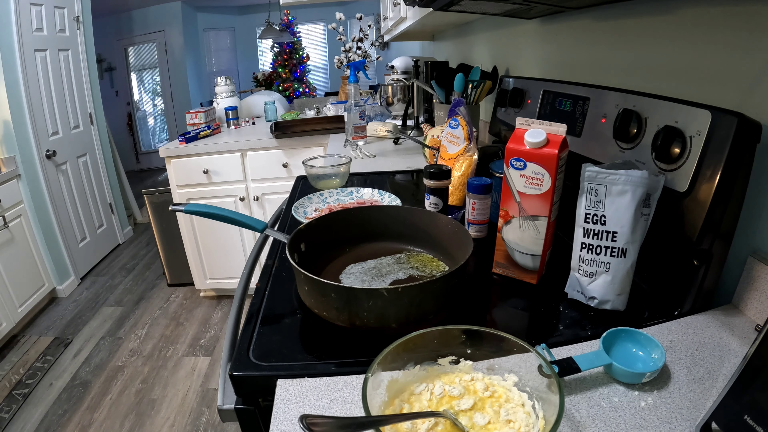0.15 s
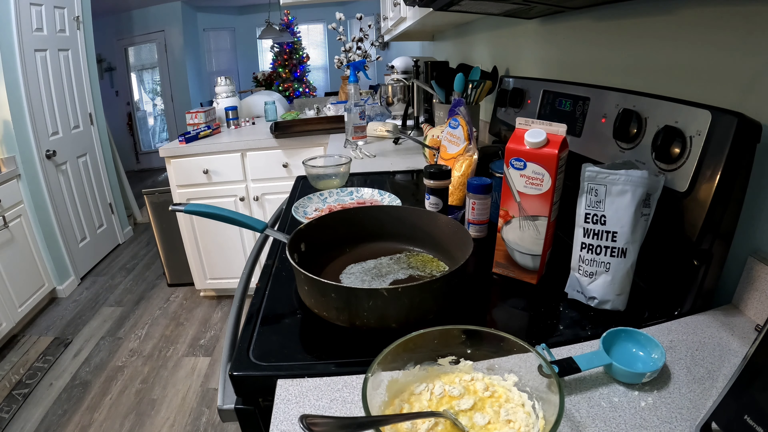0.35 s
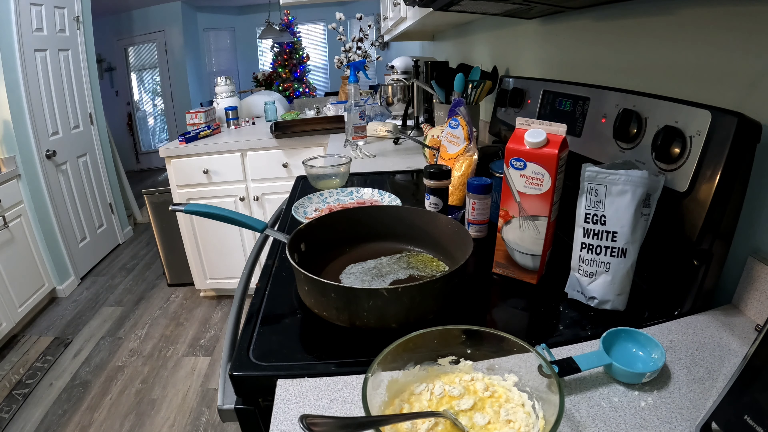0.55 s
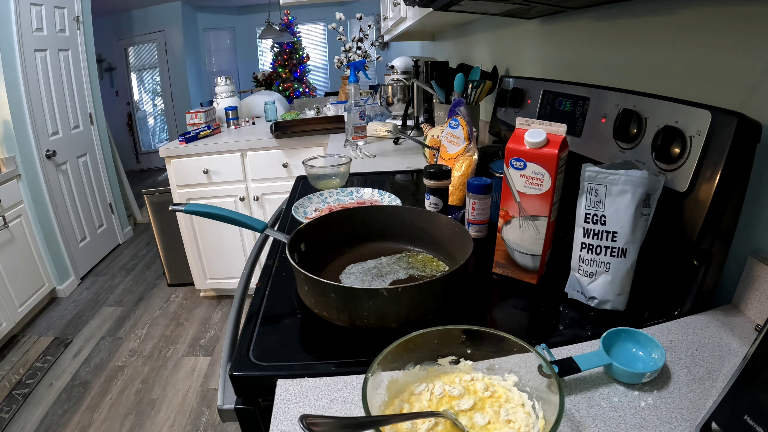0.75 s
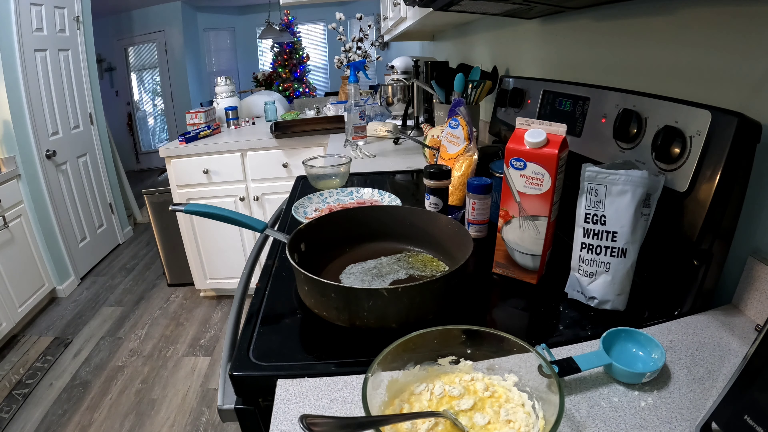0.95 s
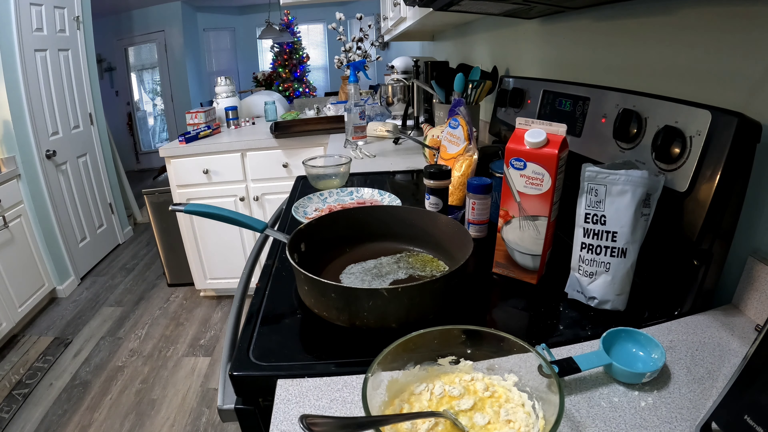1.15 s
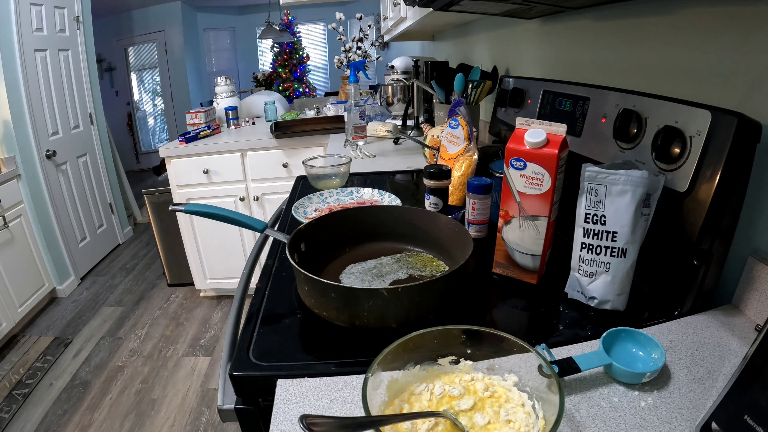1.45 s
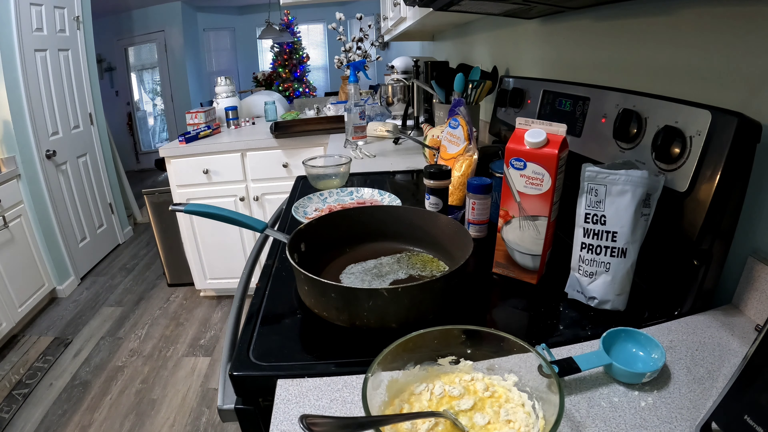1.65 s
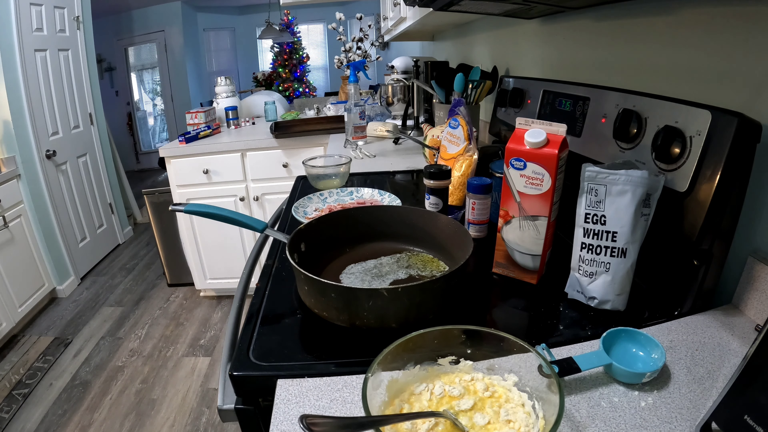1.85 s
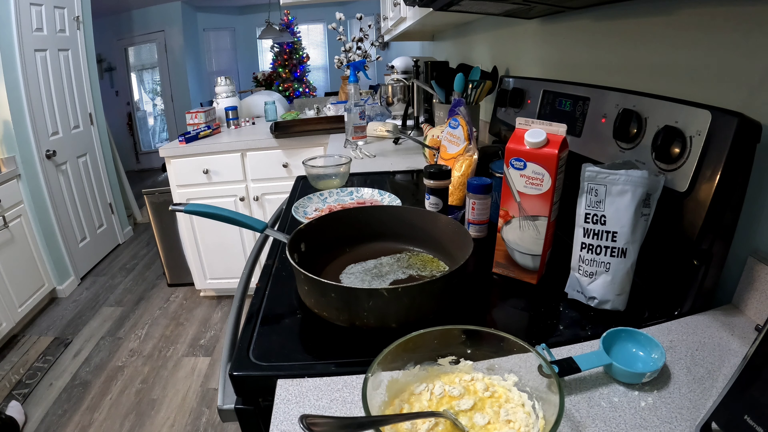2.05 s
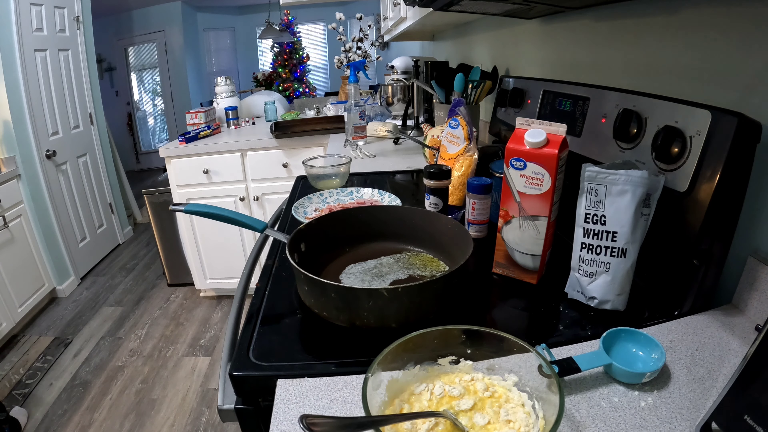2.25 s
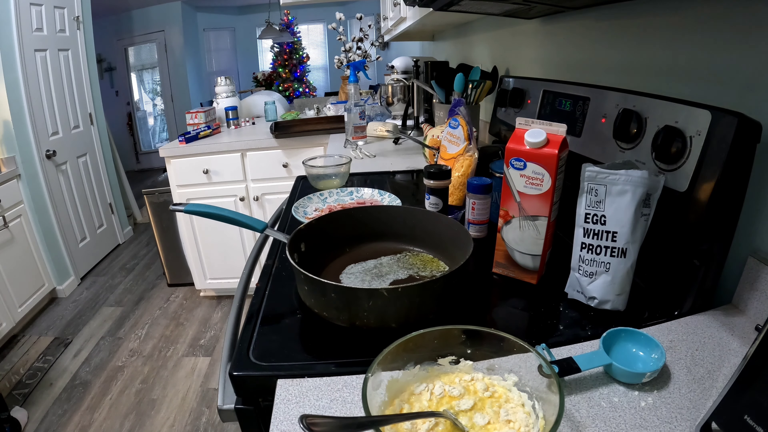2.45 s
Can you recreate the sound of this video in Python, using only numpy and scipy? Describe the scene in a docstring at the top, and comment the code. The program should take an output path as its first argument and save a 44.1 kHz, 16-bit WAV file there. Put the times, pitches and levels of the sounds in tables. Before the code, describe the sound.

A drawer of utensils is pulled and jolted a few metres off in a home kitchen, rumbling, clattering and briefly ringing, then settling into softer knocks. Close to the microphone, fat ticks and spits in a pan, popping once.

```python
"""A home kitchen, on two closely spaced microphone ports. A few metres off, a drawer of utensils is
pulled and jolted: the runners' bumps shake the cabinet into a rumble, tools clatter, and loose steel
rings in the room. Close to the microphone, fat ticks and spits in a pan, each spit a tiny burst
with a short hiss after it. Quiet room tone lies under it all."""
import sys
import numpy as np
from scipy import signal
from scipy.fft import rfft, irfft
from scipy.io import wavfile
from scipy.ndimage import uniform_filter1d

SR = 44100
rng = np.random.default_rng(int(sys.argv[2]) if len(sys.argv) > 2 else 0)


def pcm_store(signal):
    """Save signal as 16-bit PCM."""
    levels = np.round(np.clip(np.atleast_2d(signal), -1, 1) * 32767)
    wavfile.write(sys.argv[1], SR, levels.astype(np.int16).T)


N = 114660
T, HZ = np.arange(N) / SR, np.fft.rfftfreq(N, 1 / SR) + 1e-3

# jolts of the drawer's load (time [s], dull clatter [dB], bright clatter [dB], ringing steel [dB])
DRAWER_JOLTS = [(0.216, -42.5, -47, -70), (0.416, -46, -53, -84), (0.475, -32.5, -33, -45),
                (.666, -37.5, -30, -47.5), (0.727, -33.5, -24, -41.5), (.786, -39, -25.5, -26),
                (.7975, -53, -40.5, -32.5), (.832, -44, -68, -37), (0.887, -32.5, -37.5, -67),
                (.928, -36.5, -33, -38), (1.03, -28.5, -28.5, -40), (1.205, -39.5, -42, -70),
                (1.476, -36, -45.5, -46.5), (1.509, -41, -40.5, -61), (1.573, -40.5, -52, -59),
                (1.855, -42.5, -50, -58), (2.253, -43.5, -67, -68), (2.281, -38.5, -41, -67)]


def undb(db):
    return 10 ** (np.asarray(db) / 20)


def unit_rms(x):
    return x / np.sqrt(np.mean(x ** 2))


def on_hz(table):
    """Read a (frequency [Hz], value) table at every frequency."""
    hz, value = np.array(table, float).T
    return np.interp(np.log(HZ), np.log(hz), value)


def colour(x, spectrum):
    """Shape by (frequency [Hz], level [dB]); white noise keeps its rms."""
    gain = undb(on_hz(spectrum)) * (HZ > spectrum[0][0]) * (HZ < spectrum[-1][0])
    return irfft(rfft(x) * unit_rms(gain), N)


def ring(x, hz, t60):
    """One decaying mode, driven by x."""
    pole = np.exp(2j * np.pi * hz / SR - np.log(1000) / (t60 * SR))
    return signal.lfilter([1], [1, -pole], x).imag


def fade(start, t60, rise_s=.003):
    """Quick rise, exponential fall."""
    age = np.maximum(T - start, 0)
    return (1 - np.exp(-age / rise_s)) * undb(-60 * age / t60)


def clicks(per_s, spread_db):
    """Random clicks of uneven size."""
    chance, sign, size = rng.random((3, N))
    return (chance < per_s / SR) * np.sign(sign - .5) * undb(-spread_db * np.log(size + 1e-9))


def mic_ports(x, unrelated):
    """Two close ports: level and phase differ, and a share of unrelated sound enters."""
    # likeness of the two ports (frequency [Hz], coherence [0-1])
    likeness = [(100, .999), (300, .995), (700, .97), (1500, .93), (4000, .7), (12000, .6)]
    # left port over right (frequency [Hz], level [dB])
    left_level = [(200, 0), (600, 2.6), (2500, 1.5), (6000, 2.2), (12000, 0)]
    # left port against right (frequency [Hz], phase [rad])
    left_phase = [(100, 0), (450, -.15), (2500, -1.1), (3200, -.6), (6000, -.2)]
    coherence = np.clip(on_hz(likeness), 0, 1)
    mid = rfft(x) * np.sqrt((1 + coherence) / 2)
    side = rfft(unrelated) * np.sqrt((1 - coherence) / 2)
    tilt = undb(on_hz(left_level) / 2) * np.exp(.5j * on_hz(left_phase))
    return np.array([irfft((mid + side) * tilt, N), irfft((mid - side) / tilt, N)])


def kitchen(x, wet_db, low_t60=.5, treble_t60=.45):
    """Direct sound and a diffuse tail that dulls, heard at both ports."""
    t, wet = T[:SR // 2], undb(wet_db)
    def tail():
        noise = rng.standard_normal((2, len(t)))
        low = uniform_filter1d(noise[0], size=9) * undb(-60 * t / low_t60) * 3
        response = (low + noise[1] * undb(-60 * t / treble_t60)) * np.minimum(t / .0026, 1)
        return signal.fftconvolve(x, response / np.sqrt(np.sum(response ** 2)))[:N]
    total = np.hypot(1, wet)
    return mic_ports(x + wet * tail(), total * tail()) / total


def room_tone(level_db=-47):
    """The kitchen's steady background noise, mostly bass."""
    # spectrum of the quiet room (frequency [Hz], level [dB])
    spectrum = [(20, 1), (45, -3.5), (85, -3), (320, -12.5), (830, -29), (1450, -24), (2300, -27.5),
                (3000, -34), (5400, -33), (7700, -42), (15500, -58.5)]
    return mic_ports(*(colour(noise, spectrum) for noise in rng.standard_normal((2, N)))) * undb(level_db)


def frying(pop_db=14, snap_db=-9, crackle_db=-66, hiss_db=-7, left_db=-.5):
    """Close up: each spit of fat is a burst of a few cycles and a hiss of the pan; crackle between."""
    # spits of fat; the big ones also pop low (time [s], level [dB], pitch [Hz])
    spits = [(.0422, -42, 6400), (.1047, -62, 5800), (.1486, -51, 6940), (.1565, -40.5, 5300),
             (.2868, -42.5, 2600), (.3433, -44, 5630), (.358, -42.5, 5300), (.3926, -42.5, 5270),
             (0.49, -27, 5430), (.628, -36.5, 7760), (.6434, -37.5, 5540), (1.2044, -15, 990),
             (1.2045, -28.5, 2900), (1.2047, -30.5, 5840), (1.2599, -35, 6000), (1.2957, -38, 6800),
             (1.3229, -47, 6700), (1.3399, -43, 5950), (1.3618, -41, 5700), (1.3813, -36.5, 4080),
             (1.3815, -36, 2330), (1.398, -37.5, 5900), (1.4541, -45, 6500), (1.4735, -35, 6240),
             (1.6395, -32, 3530), (1.7, -37, 5560), (1.801, -44, 5100), (1.8172, -31, 990),
             (1.8173, -31, 2860), (1.8174, -24.5, 5820), (1.8382, -32, 4660), (1.9687, -28, 6200),
             (1.9884, -32, 6000), (2.0122, -27.5, 4960), (2.173, -38.5, 5660), (2.2179, -43, 6050),
             (2.2715, -37.5, 6200), (2.2895, -33, 3700), (2.2901, -35, 5470), (2.367, -33, 2140),
             (2.4538, -37, 5900), (2.5944, -31, 6100)]
    length, spit_t60, hiss_t60 = 600, .009, .1
    fat, decay = np.zeros(N + length), undb(-60 * T[:length] / spit_t60)
    bursts = rng.standard_normal((len(spits), length))
    bursts[:, 8] += undb(pop_db)  # a sharp pop, then fizz
    for (start, db, hz), burst in zip(spits, bursts):
        pitched = signal.lfilter(*signal.butter(2, [hz / 1.25, hz * 1.25], "bandpass", fs=SR), burst)
        i = int(start * SR)
        fat[i:i + length] += undb(db) * (unit_rms(pitched) + undb(snap_db) * unit_rms(burst)) * decay
    crackle_band = signal.butter(2, [4800, 8500], "bandpass", fs=SR)
    crackle = signal.lfilter(*crackle_band, clicks(per_s=120, spread_db=2.5))
    fat = fat[:N] + undb(crackle_db) * unit_rms(crackle)
    fat = signal.lfilter(*signal.butter(3, 7900, fs=SR), fat)
    pan = rng.standard_normal((2, 6000)) + rng.standard_normal(6000)  # half shared by left and right
    pan *= undb(-60 * T[:6000] / hiss_t60)
    pan /= np.sqrt(np.sum(pan ** 2) / 2)
    hiss = signal.fftconvolve(fat[None], pan, axes=1)[:, :N]
    return (fat + undb(hiss_db) * hiss) * undb([[left_db / 2], [-left_db / 2]])


def cabinet():
    """Bumps of the runners shake the carcass and its panels; one panel hums for a moment."""
    # thumps through the cabinet (time [s], bass level [dB], panel level [dB])
    thumps = [(0.049, -46, -55), (0.159, -35.5, -51), (0.223, -31, -42), (.38, -37, -39.5),
              (0.476, -29.5, -34.5), (0.582, -32, -42), (0.67, -34, -35.5), (0.76, -23, -31.5),
              (0.864, -22.5, -32), (0.908, -24, -28.5), (1.003, -23.5, -32), (1.059, -22, -36),
              (1.2, -29.5, -43), (1.311, -36.5, -45.5), (1.366, -32, -38), (1.476, -27, -32),
              (1.542, -28, -31.5), (1.611, -30.5, -36), (1.676, -31, -43), (1.854, -28.5, -41),
              (1.932, -29, -45), (2.168, -31.5, -42.5), (2.268, -28, -30.5), (2.31, -59, -46)]
    # bass modes of the carcass (frequency [Hz], nominal width [Hz], level [dB])
    carcass = [(46.4, 40, -15), (72.4, 6.2, -4), (112.2, 19.4, -9)]
    # modes of the panels (frequency [Hz], nominal width [Hz], level [dB])
    panels = [(151.6, 35, -2.5), (202, 23.4, 0.5), (261.7, 31.5, -4), (297.8, 27, 1), (350.5, 11.7, -1.5),
              (417.8, 24, -6)]
    # one panel's sinking hum (time [s], pitch [Hz], level [dB])
    hum_path = [(.13, 147.4, -74), (0.169, 145.8, -45), (.55, 141.2, -41.5), (0.641, 135, -46)]
    starts, bass_db, panel_db = np.array(thumps).T
    envelopes = np.array([fade(start, t60=.42, rise_s=.0067) for start in starts])
    rumble = 0
    for levels, modes in ((bass_db, carcass), (panel_db, panels)):
        bumps, body = clicks(per_s=250, spread_db=1.2), 0
        for hz, width, db in modes:
            t60 = 1.92 / width
            body += undb(db) * unit_rms(ring(ring(bumps, hz, t60), hz, t60))
        # even out the body so that the thumps set its level
        body /= np.sqrt(uniform_filter1d(body ** 2, size=SR // 30) + .023 * np.mean(body ** 2))
        rumble += body * np.sqrt(undb(2 * levels) @ envelopes ** 2)
    times, hum_hz, hum_db = np.array(hum_path).T
    hum = np.sqrt(2) * np.sin(2 * np.pi * np.cumsum(np.interp(T, times, hum_hz)) / SR)
    return rumble + hum * undb(np.interp(T, times, hum_db, left=-99, right=-99))


def rattle(starts, levels_db):
    """Tools knock together: each jolt sets off dense, fading clicks."""
    envelopes = np.array([fade(start, t60=.18) for start in starts])
    return undb(levels_db) @ envelopes * unit_rms(clicks(per_s=3500, spread_db=2.5))


def pings():
    """Single pieces ring out on one note."""
    # struck pieces (time [s], pitch [Hz], level [dB])
    notes = [(0.939, 3400, -33.5), (.978, 3400, -32), (1.114, 1810, -33.5), (1.142, 1531, -29.5),
             (1.155, 878, -36), (1.208, 1531, -31), (1.292, 1500, -47), (1.595, 1550, -38)]
    return sum(undb(db) * fade(t, t60=.2) * np.sin(2 * np.pi * hz * (T - t)) for t, hz, db in notes)


def ringing_steel(rattle_db=-27, scatter_db=2.5, lag_s=.0035, t60_at_1khz=.17):
    """Each jolt strikes the loose steel, every mode unevenly; higher modes die sooner."""
    # modes of the steel tools (frequency [Hz], level [dB])
    modes = [(905, -5), (995, -4), (1560, -8), (1650, -7), (2185, 2), (2277, 2), (2415, -8), (3200, -6),
             (3375, -7), (3510, -7)]
    starts, _, _, steel_db = np.array(DRAWER_JOLTS).T
    jostle, steel = rattle(starts, steel_db) * undb(rattle_db), 0
    uneven_db = scatter_db * rng.standard_normal((len(starts), len(modes)))
    for (hz, db), offset_db in zip(modes, uneven_db.T):
        push = jostle.copy()
        push[((starts + lag_s) * SR).astype(int)] += undb(steel_db + offset_db)
        steel += undb(db) * ring(push, hz, t60_at_1khz * (hz / 1000) ** -.2)
    return steel


def clatter():
    """The drawer's load rattles at each jolt, in a dull layer and a bright one."""
    # spectrum of the dull knocks (frequency [Hz], level [dB])
    dull = [(450, -2.5), (620, -0.5), (780, -7), (1000, -3), (1300, -1), (1850, -3.5), (2250, 0.5),
            (2700, -14.5), (4000, -21)]
    # spectrum of the bright knocks (frequency [Hz], level [dB])
    bright = [(1530, -17), (2600, -2.5), (2880, -7), (3400, 1), (3800, 2.5), (4850, -0.5), (6450, -5.5),
              (15000, -42.5)]
    starts, dull_db, bright_db, _ = np.array(DRAWER_JOLTS).T
    return colour(rattle(starts, dull_db), dull) + colour(rattle(starts, bright_db), bright)


def scene():
    """The drawer a few metres off, its clatter mostly reverberant; the pan close to the microphone."""
    tone, rumble, tools = room_tone(), cabinet(), clatter()
    steel = ringing_steel() + pings()
    drawer = kitchen(tools, wet_db=6.5) + kitchen(steel, wet_db=-13)
    return tone + mic_ports(rumble, np.roll(rumble, 900)) + frying() + drawer


def record(dry, top_hz=15300):
    """The camera's steep low-pass cuts the top of the treble."""
    return signal.sosfilt(signal.ellip(10, 1, 70, top_hz, fs=SR, output="sos"), dry)


dry = scene()
out = record(dry)
pcm_store(out)
```